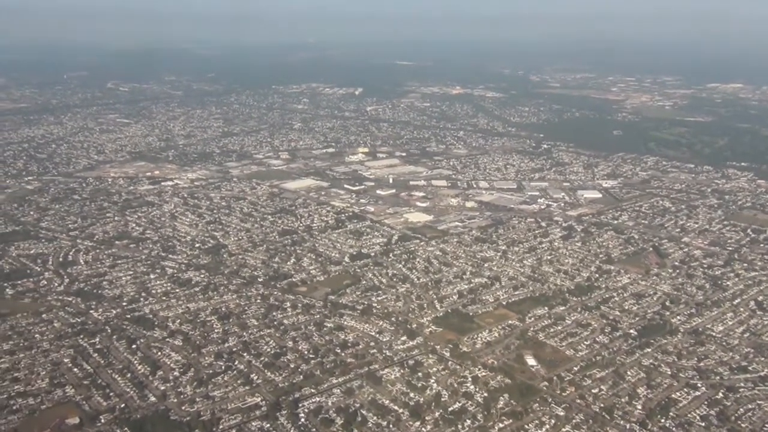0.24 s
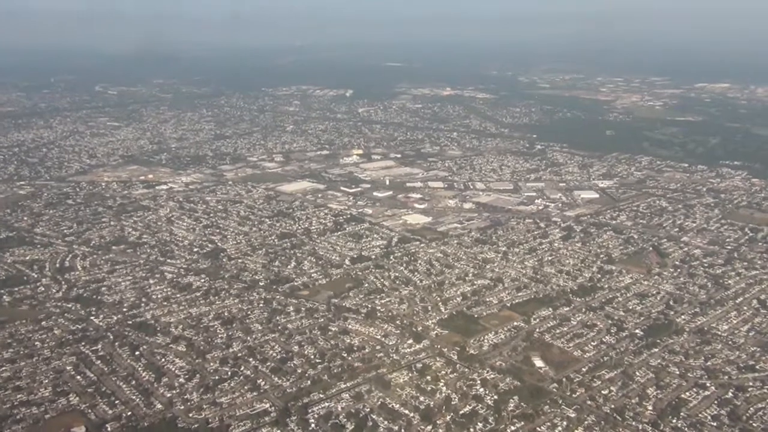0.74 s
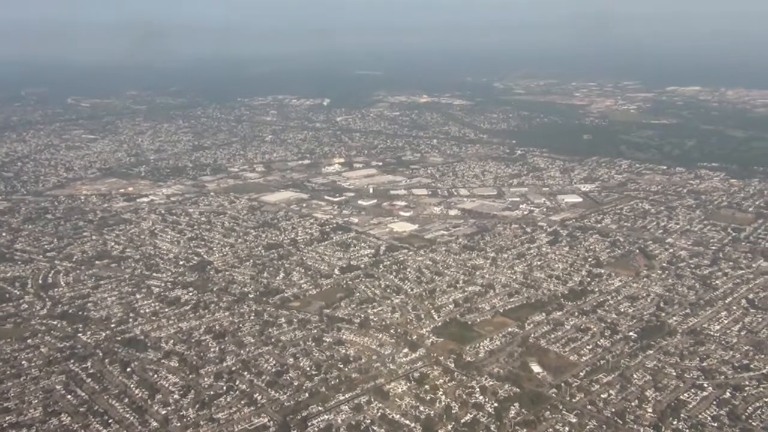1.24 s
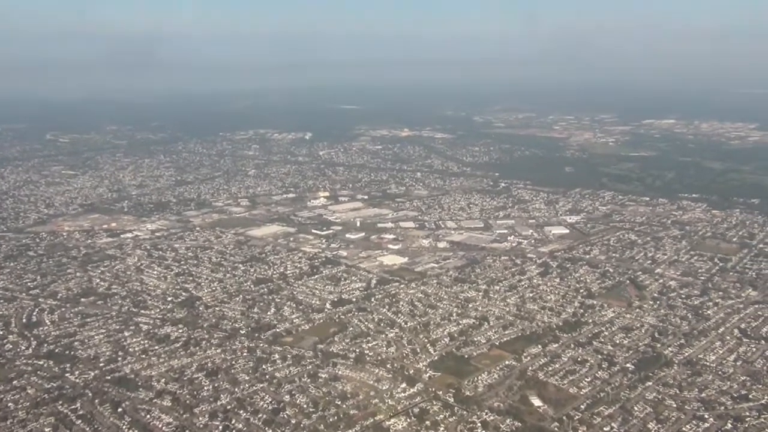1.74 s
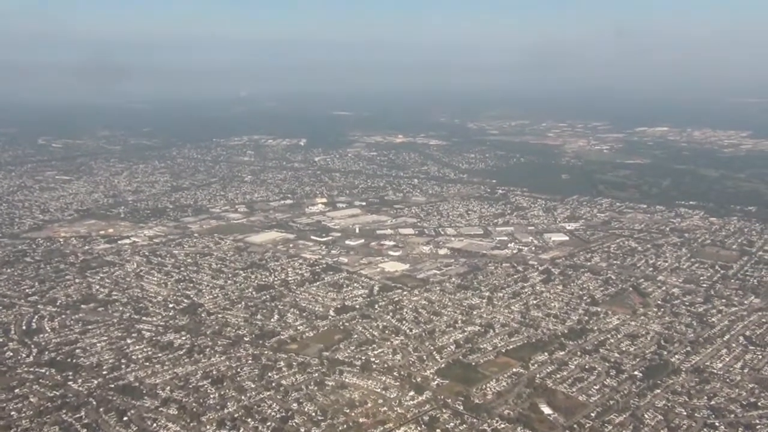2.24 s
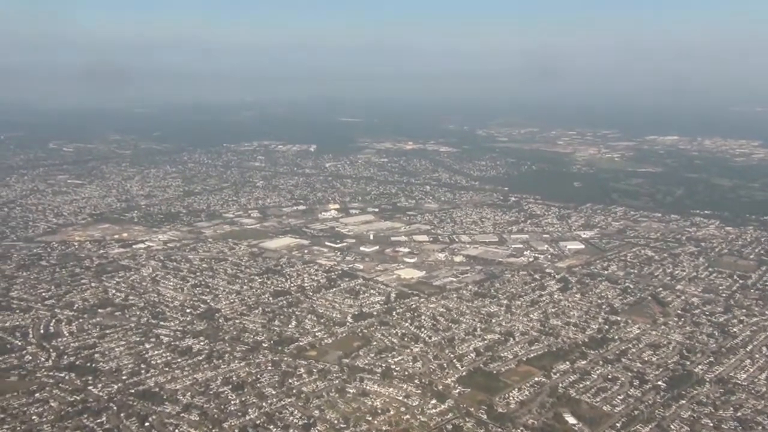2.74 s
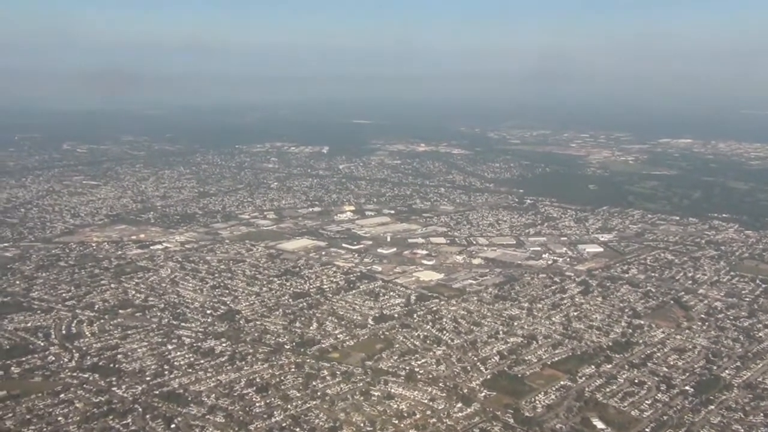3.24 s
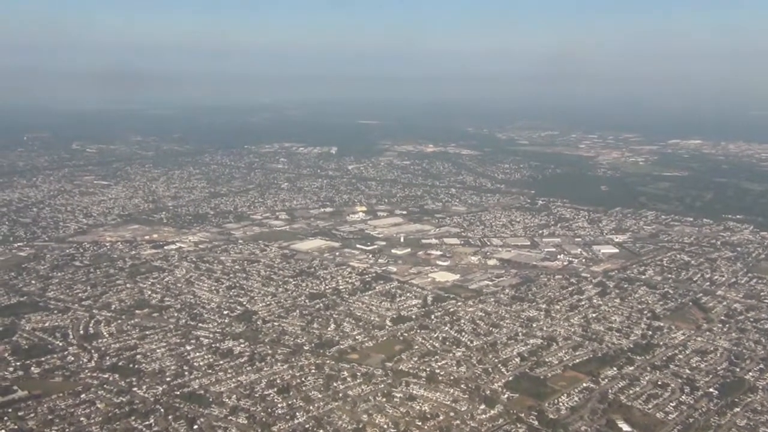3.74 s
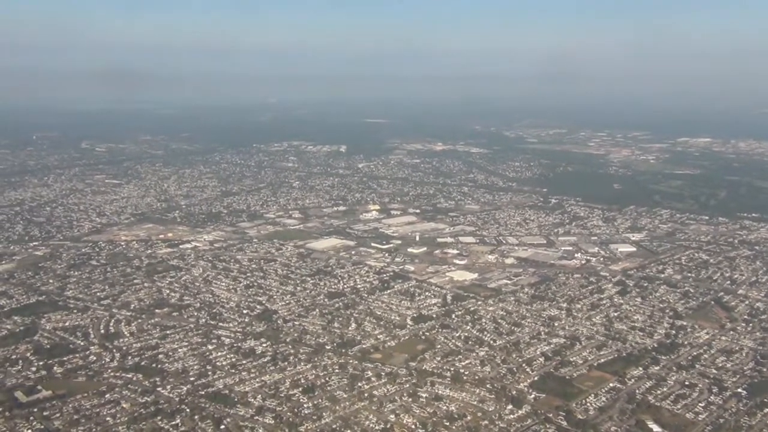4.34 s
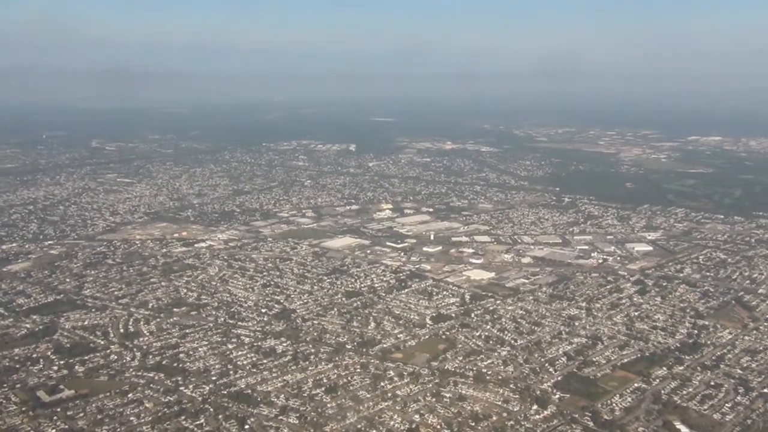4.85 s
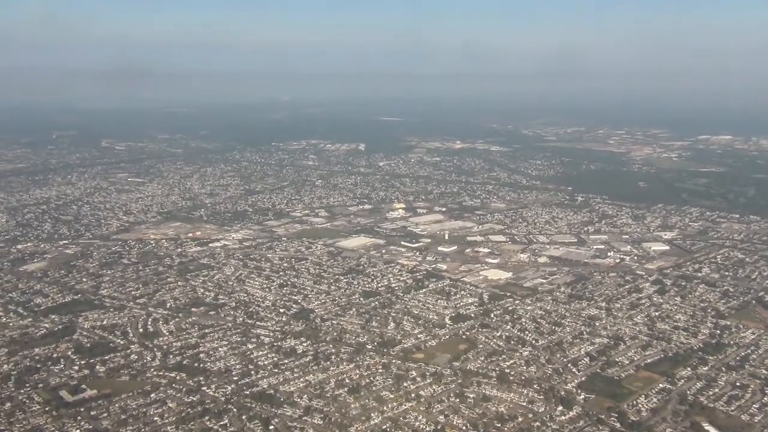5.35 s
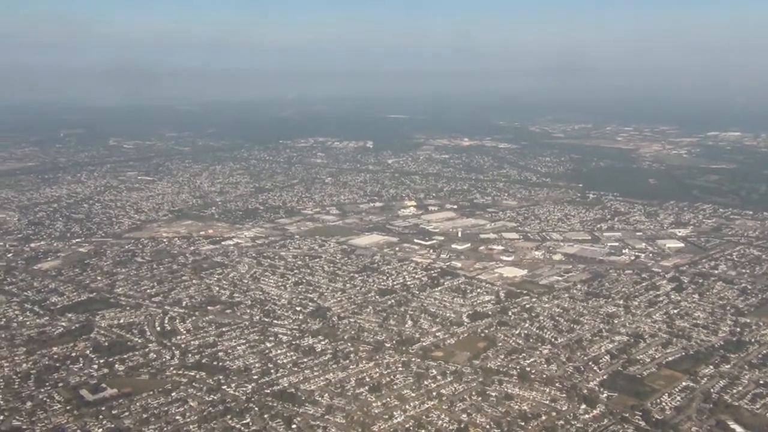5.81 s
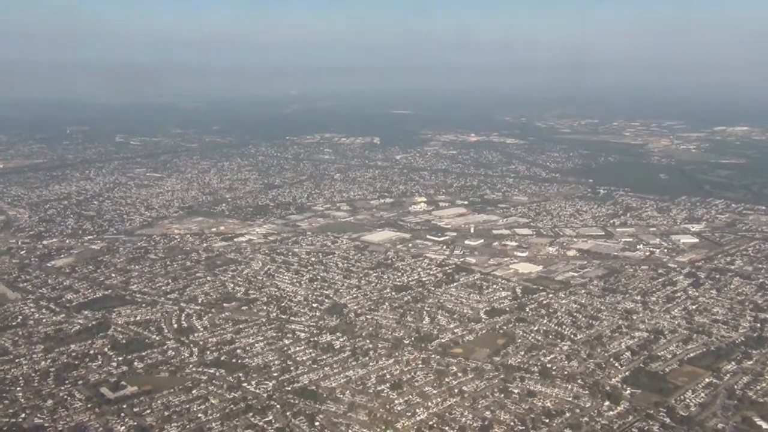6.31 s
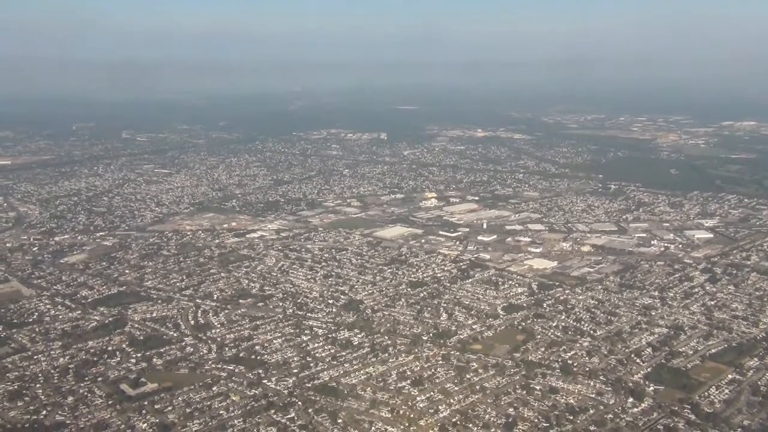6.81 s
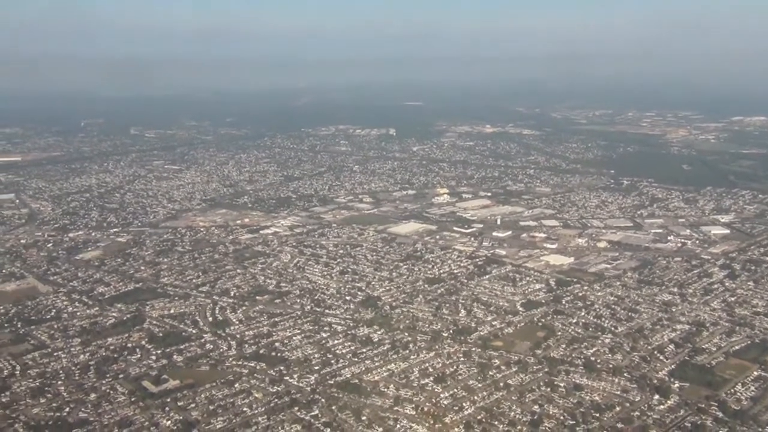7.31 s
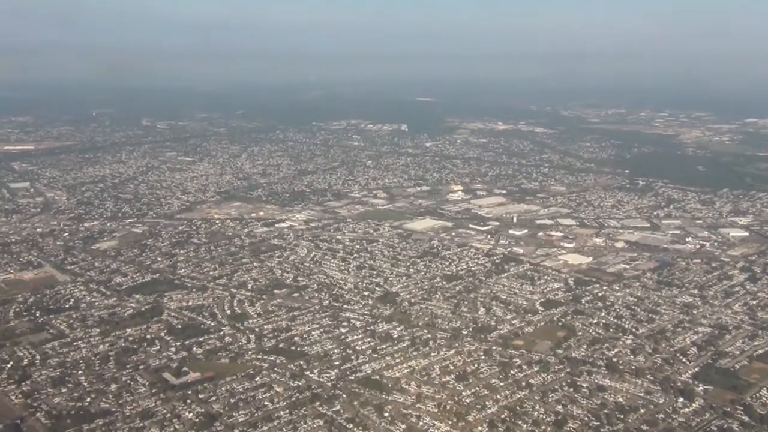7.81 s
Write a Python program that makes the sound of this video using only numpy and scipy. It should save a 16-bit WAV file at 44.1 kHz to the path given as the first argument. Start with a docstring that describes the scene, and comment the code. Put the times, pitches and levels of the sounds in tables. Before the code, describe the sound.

Steady jet roar and rushing air fill an airliner cabin, with a low fan hum, faint whines and two small ticks.

```python
"""Airliner cabin in flight, at a window seat.
Jet roar and air rushing along the hull fill the cabin; ducts, turbines and screens whine faintly.
A ventilation fan hums at shaft rate, whines at blade rate and beats with a second fan.
Halfway through, the hull starts to throb and a small turbine's thin whistle climbs, overshoots
and settles. The cabin trim ticks twice."""
import sys
import numpy as np
from scipy import signal
from scipy.fft import rfft, irfft
from scipy.io import wavfile
from scipy.ndimage import uniform_filter1d, minimum_filter1d

SR = 44100
rng = np.random.default_rng(int(sys.argv[2]) if len(sys.argv) > 2 else 0)


def to_wav(sig):
    """Store sig (one row per channel, or 1-D mono) as 16-bit WAV at the path in sys.argv[1].

    Samples outside -1..1 are clipped; the rate is SR.
    """
    pcm = np.clip(np.atleast_2d(sig), -1, 1) * 32767
    pcm = np.round(pcm).astype(np.int16)
    wavfile.write(sys.argv[1], SR, pcm.T)  # frames by channels


N = 355887
TIME_S = np.arange(N) / SR
FREQ_HZ = np.fft.rfftfreq(N, 1 / SR)


def amp(db):
    """Decibels to gain."""
    return 10 ** (np.asarray(db) / 20)


def unit_rms(x):
    """Scale to rms 1."""
    return x / np.sqrt(np.mean(x ** 2) + 1e-20)


def over_freq(table):
    """Rows of (freq_hz, value) read at every bin, on a log axis."""
    hz, value = np.transpose(table)
    return np.interp(np.log(FREQ_HZ + 1), np.log(hz + 1), value)


def over_time(table):
    """Rows of (time_s, value) read at every sample."""
    time_s, value = np.transpose(table)
    return np.interp(TIME_S, time_s, value)


def onset(start_s, rise_s):
    """Ramp from 0 to 1, then hold."""
    return np.clip((TIME_S - start_s) / rise_s, 0, 1)


def band(low_hz, high_hz):
    """Gain of a steep band-pass with soft shoulders."""
    return 1 / (1 + (low_hz / (FREQ_HZ + 1)) ** 20) / (1 + (FREQ_HZ / high_hz) ** 20)


def white_spectrum():
    """Spectrum of fresh white noise."""
    return rfft(rng.standard_normal(N))


def drift(rate_hz):
    """Low-passed random motion, rms 1."""
    low_pass = np.exp(-.5 * (FREQ_HZ / rate_hz) ** 2) * (FREQ_HZ > 0)
    return unit_rms(irfft(white_spectrum() * low_pass, N))


def tone(pitch_hz, level_db, wander=0., flutter_db=0., rate_hz=4.):
    """Sine with wavering pitch and level; wander is a fraction of the pitch."""
    turns = np.cumsum(pitch_hz * (1 + wander * drift(rate_hz))) / SR
    peak = np.sqrt(2) * amp(level_db + flutter_db * drift(rate_hz))
    return peak * np.sin(2 * np.pi * (turns + rng.random()))


def resonant_noise(centre_hz, width_hz, level_db):
    """Noise in one resonance."""
    resonance = 1 / (1 + (2 * (FREQ_HZ - centre_hz) / width_hz) ** 2)
    return amp(level_db) * unit_rms(irfft(white_spectrum() * resonance, N))


def at_level(spectrum, level_db, window_s=0.14):
    """Stereo noise whose slow rms follows level_db; its fast flutter stays random."""
    noise = irfft(spectrum, N)
    power = uniform_filter1d((noise ** 2).mean(0), int(window_s * SR))
    return noise / np.sqrt(power + 1e-12) * amp(level_db)


def hull_noise():
    """Stereo spectrum of jet and air noise: it enters from all sides, nearly alike left and right."""
    # freq_hz, density_db (before band levels and airflow)
    jet_roar = [(20, -70), (30, -61.5), (52, -45), (74, -51.5), (105, -34.5), (120, -30.5), (150, -38.5),
                (190, -40.5), (222, -42), (262, -34.5), (300, -30), (345, -37), (380, -47.5), (420, -43),
                (470, -49.5)]
    air_rush = [(550, -50), (650, -49.5), (730, -53.5), (835, -51.5), (900, -53), (1010, -57.7),
                (1130, -58), (1340, -65), (1430, -61.5), (1520, -63.3), (1650, -62.5), (1950, -67),
                (2400, -69), (2540, -71.5), (2650, -70), (3000, -73), (3300, -76), (3600, -81)]
    air_hiss = [(4400, -82.5), (5400, -82), (6000, -85.5), (6500, -83.5), (7600, -90), (8700, -94.5),
                (9400, -92.0), (10700, -100.0), (11800, -98), (13400, -104.8), (15400, -105)]
    # left-right likeness: freq_hz, coherence
    likeness = [(30, .92), (68, 0.93), (105, .995), (190, 0.99), (300, 0.99), (500, 0.98), (800, 0.98),
                (1550, 1), (2500, 0.98), (4200, 0.99), (6000, 0.92), (8000, .68), (10000, .995),
                (12000, .998)]
    coherence = np.clip(over_freq(likeness), 0, .999)
    mid = np.sqrt((1 + coherence) / 2) * white_spectrum()
    side = np.sqrt((1 - coherence) / 2) * white_spectrum()
    colour = np.sqrt(SR / 2) * amp(over_freq(jet_roar + air_rush + air_hiss))
    return np.array([mid + side, mid - side]) * colour


def roar_and_rush(low_db=-18.5, mid_db=-14.5, waver_db=0.64, hiss_hz=2600, flicker_db=0.5):
    """The low roar's level wavers irregularly in two bands; hiss follows the airflow, rush less so."""
    # time_s, gain_db
    low_band_level = [(0.0, 2), (0.2, -5.5), (0.32, 3.5), (0.46, -3), (0.72, 3.5), (0.91, -7.5),
                      (1.04, 2.6), (1.88, 0.0), (2.14, 3), (2.28, -4), (2.54, 4), (2.86, 0.0), (3.06, 3.5),
                      (3.25, -5.5), (3.38, 5), (3.51, 0.4), (3.97, -1.2), (4.42, 4.5), (4.62, -4),
                      (4.94, 2.5), (5.26, -1.7), (5.52, 1), (5.92, -2), (6.24, 1), (6.5, 2.4), (6.76, -1.3),
                      (6.89, 4), (7.02, -3), (7.41, 1.5), (7.54, -3.5), (7.67, -1.5), (8.06, -4)]
    mid_band_level = [(0.0, -0.5), (0.26, 0), (0.46, -1), (0.58, 1.3), (0.65, -2), (1.3, 1.5), (1.56, -3),
                      (1.76, -4), (1.82, 2.5), (1.95, -2.7), (2.14, 0.6), (2.21, 4.5), (2.41, -1),
                      (2.8, 1.2), (3.18, -1), (3.32, 1.5), (3.58, -4), (3.7, -0.2), (3.9, -4.5),
                      (3.97, 1.0), (4.68, -0.9), (4.88, 2.5), (5.72, -1.8), (6.18, 2), (6.5, -2.5),
                      (6.89, 0.8), (7.48, -0.4), (8.06, 0)]
    airflow = [(0, -0.7), (1.0, -0.3), (1.4, 0.3), (2.1, 1.1), (2.6, 0.4), (3.25, 1.2), (3.6, -1.5),
               (4.3, 0), (4.9, 1), (5.8, 0), (6.5, -0.7), (7.5, 1), (8.07, -1)]
    spectrum = hull_noise()
    low_band, mid_band = band(low_hz=74, high_hz=154), band(low_hz=218, high_hz=340)
    hiss_band = FREQ_HZ ** 4 / (FREQ_HZ ** 4 + hiss_hz ** 4)
    rush_band = 1 - hiss_band - low_band - mid_band
    low_roar = at_level(spectrum * low_band, low_db + over_time(low_band_level) + waver_db * drift(3.1))
    mid_roar = at_level(spectrum * mid_band, mid_db + over_time(mid_band_level) + waver_db * drift(2.7))
    airflow_db = over_time(airflow)
    hiss = irfft(spectrum * hiss_band, N) * amp(airflow_db + flicker_db * drift(6))
    rush = irfft(spectrum * rush_band, N) * amp(0.51 * airflow_db)
    return low_roar + mid_roar + rush + hiss


def high_whine(width_hz=480):
    """Very faint narrow hiss on a pitch that slides down and back up."""
    # time_s, pitch_hz
    glide = [(0, 15250), (1.4, 14350), (2.05, 14200), (2.15, 14750), (2.6, 15100), (2.85, 14550),
             (4.1, 14000), (5.0, 14200), (5.2, 14800), (5.8, 15050), (5.95, 14500), (7.5, 14150),
             (7.75, 15050)]
    carrier = tone(over_time(glide), level_db=-77.5, flutter_db=2.5, rate_hz=6)
    return carrier * drift(width_hz / 2)


def screens(line_hz=15734, refresh_hz=60, flutter_hz=13):
    """Fluttering line whine of the cabin screens, blanked briefly at each refresh."""
    lit = (TIME_S * refresh_hz) % 1 > .08
    flutter = 1 + .4 * np.sin(2 * np.pi * flutter_hz * TIME_S)
    return tone(line_hz, level_db=-67.5) * lit * flutter


def duct_whines(vent_crest_s=5.6, vent_slope_db_per_s=1.5):
    """Ducts and turbines whine in narrow noise bands; one vent grows to a crest and eases."""
    # one entry per steady whine
    centres_hz = [2475, 2635, 3099]
    widths_hz = [18, 40, 18]
    levels_db = [-50, -56, -57.5]
    vent_db = -53 - vent_slope_db_per_s * abs(TIME_S - vent_crest_s)
    vent = resonant_noise(centre_hz=3280, width_hz=42, level_db=vent_db)
    return vent + sum(resonant_noise(*whine) for whine in zip(centres_hz, widths_hz, levels_db))


def fans(blades=11, hum_db=-22.2):
    """One shaft gives an imbalance hum and a blade tone; a weaker, slower fan beats with the hum."""
    # time_s, shaft_hz
    fan_speed = [(1.8, 192.0), (3.1, 193.1), (4.4, 192.9), (5.2, 191.7), (7.0, 192.1)]
    # time_s, gain_db
    hum_swell = [(0.0, -2.5), (0.39, -5), (0.78, 4), (1.43, -3.5), (1.95, 3.5), (2.41, -0.7), (2.92, 3),
                 (3.38, 0), (3.9, -3), (4.29, 5.5), (4.49, -3), (4.88, 4), (5.2, -6.5), (5.33, 0),
                 (6.31, 3.5), (7.35, -3.5), (7.54, 4.5), (8.06, -3)]
    shaft_hz = over_time(fan_speed)
    hum = tone(shaft_hz, hum_db + over_time(hum_swell), wander=.006, flutter_db=1.63, rate_hz=5.8)
    second_fan = tone(pitch_hz=186, level_db=-31.5, wander=.012, flutter_db=1.0, rate_hz=3)
    blade_tone = tone(blades * shaft_hz, level_db=-48, wander=.0024, flutter_db=3.5, rate_hz=8)
    return hum + second_fan + blade_tone


def trim_ticks(attack_s=.003):
    """Cabin trim ticks: each a burst of noise in one band, dying quickly."""
    # start_s, level_db, centre_hz, width_octaves, t60_s
    ticks = [(6.218, -36, 4500, 0.4, .1), (6.556, -34.5, 3090, .035, .07)]
    out = np.zeros(N)
    for start_s, level_db, centre_hz, width_octaves, t60_s in ticks:
        octaves = np.log2((FREQ_HZ + 1) / centre_hz)
        ring = unit_rms(irfft(white_spectrum() * np.exp(-.5 * (octaves / width_octaves) ** 2), N))
        decay = np.exp(-np.log(1000) * abs(TIME_S - start_s) / t60_s)
        out += amp(level_db) * ring * onset(start_s, attack_s) * decay
    return out


def hull_throb(crest_s=6.5, slope_db_per_s=4.5):
    """Deep hull vibration swells to a crest and eases, with a steady rumble above it."""
    shake_db = -33.5 - slope_db_per_s * abs(TIME_S - crest_s)
    shake = tone(pitch_hz=37.7, level_db=shake_db, wander=.01, flutter_db=.5, rate_hz=1.5)
    rumble = resonant_noise(centre_hz=87, width_hz=17, level_db=-32.5)
    return onset(start_s=4.25, rise_s=.19) * (shake + rumble)


def turbine_whistle(start_s=4.38, level_db=-59):
    """A small turbine spins up and settles like a damped spring; a duct resonance lifts it in passing."""
    final_hz, swing_hz = 5455, 410
    first_pass_s, period_s, settle_s = 4.86, 2.7, 1.1
    duct_hz, duct_width_hz, duct_db = 5595, 60, 6
    since_pass_s = np.maximum(TIME_S, start_s) - first_pass_s
    swing = np.exp(-since_pass_s / settle_s) * np.sin(2 * np.pi * since_pass_s / period_s)
    pitch_hz = final_hz + swing_hz * swing
    lift_db = duct_db * np.exp(-((pitch_hz - duct_hz) / duct_width_hz) ** 2)
    whistle = tone(pitch_hz, level_db + lift_db, wander=.0019, flutter_db=3.0, rate_hz=25)
    return onset(start_s, rise_s=.22) * whistle


def scene():
    """All sources; reflections from the wall beside the seat tip each band to one side."""
    # freq_hz, left_minus_right_db
    balance = [(35, -1.2), (66, -2.5), (95, -1.5), (130, -3), (255, 1.5), (370, -1.5), (440, 2.3),
               (590, .3), (830, 3.5), (1450, -0.6), (2120, 2), (2350, 0.5), (2650, 3), (3270, -2.5),
               (3800, 0.7), (10000, 0.03)]
    # freq_hz, left_lead_rad
    phase_lead = [(32, -.04), (55, -.15), (78, .16), (100, .05), (118, -.09), (140, 0)]
    cabin = roar_and_rush() + hull_throb() + fans() + duct_whines()
    cabin += turbine_whistle() + trim_ticks() + screens() + high_whine()
    lean_db = over_freq(balance) / 2
    phasor = np.exp(1j * over_freq(phase_lead) / 2)
    wall_response = amp([lean_db, -lean_db]) * np.array([phasor, 1 / phasor])
    return irfft(rfft(cabin) * wall_response, N)


def record(dry, knee=0.71, cutoff_hz=15820):
    """Soft peak limiter, then a steep low-pass."""
    excess = np.maximum(abs(dry) - knee, 0)
    rounded_excess = (1 - knee) * np.tanh(excess / (1 - knee))
    needed_gain = 1 - (excess - rounded_excess) / (abs(dry) + 1e-9)
    # hold and smooth the gain around each peak: no crackle
    gain = minimum_filter1d(needed_gain.min(0), size=600)
    gain = uniform_filter1d(uniform_filter1d(gain, size=300), size=300)
    low_pass = signal.firwin(1023, cutoff_hz, window=("kaiser", 9), fs=SR)
    return signal.oaconvolve(dry * gain, low_pass[None], "same")


dry = scene()
out = record(dry)
to_wav(out)
```